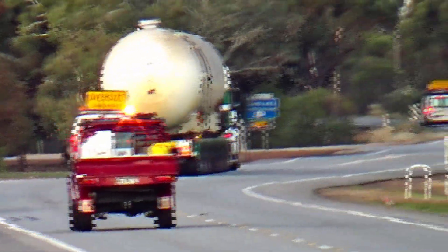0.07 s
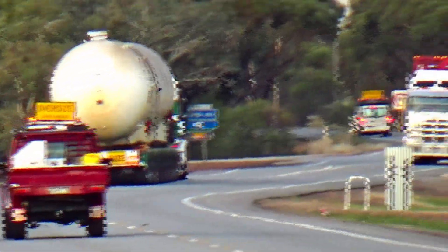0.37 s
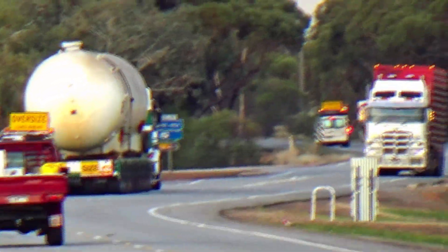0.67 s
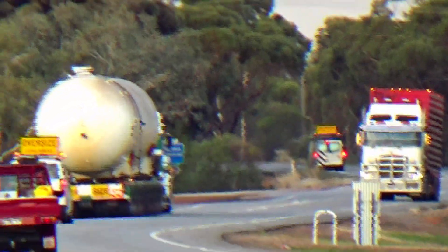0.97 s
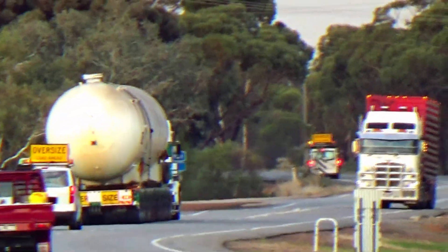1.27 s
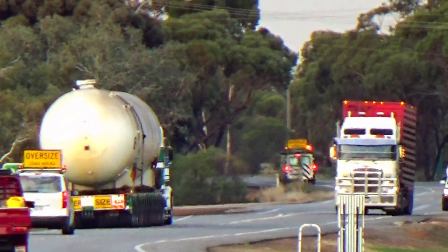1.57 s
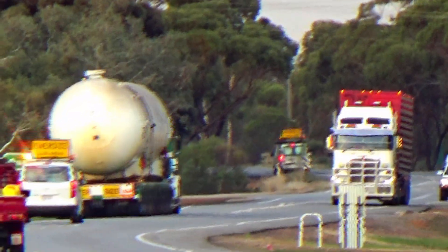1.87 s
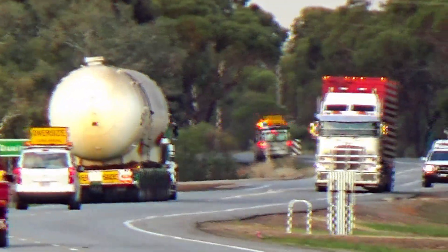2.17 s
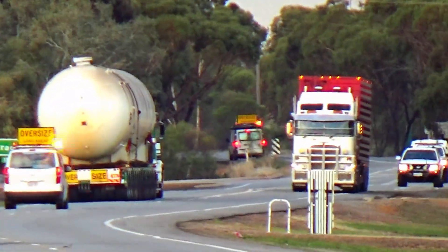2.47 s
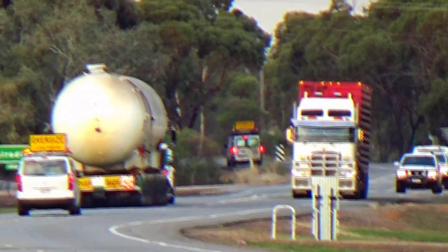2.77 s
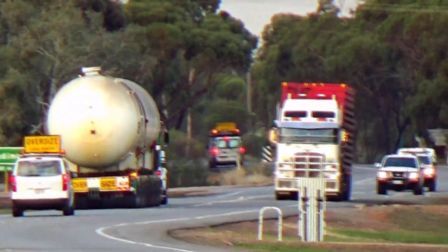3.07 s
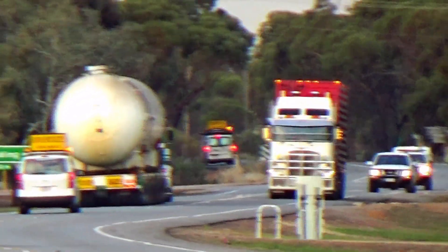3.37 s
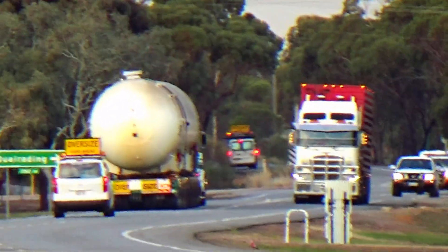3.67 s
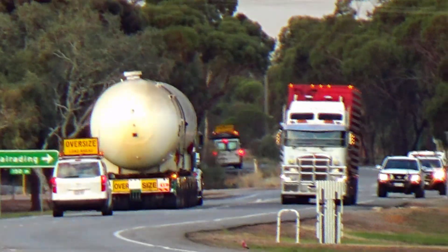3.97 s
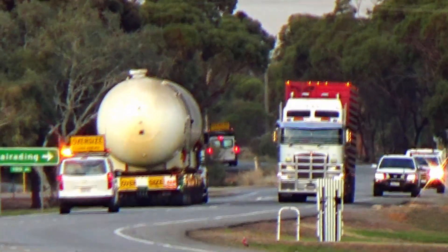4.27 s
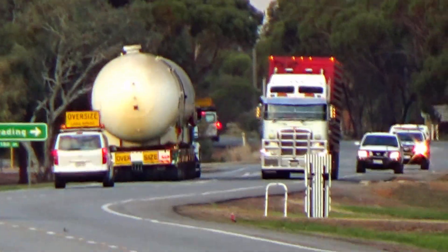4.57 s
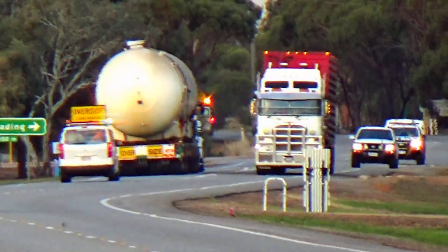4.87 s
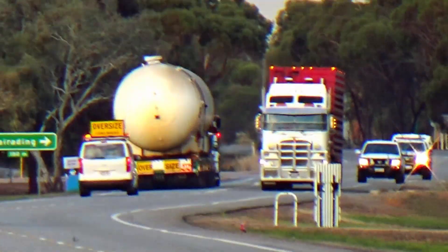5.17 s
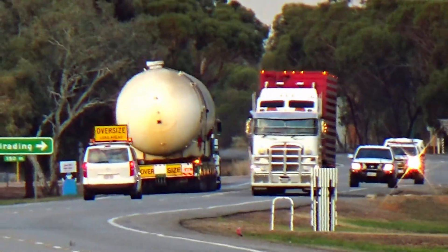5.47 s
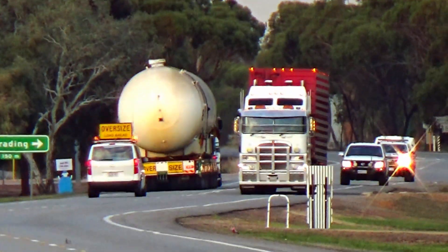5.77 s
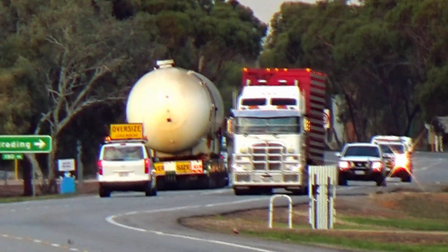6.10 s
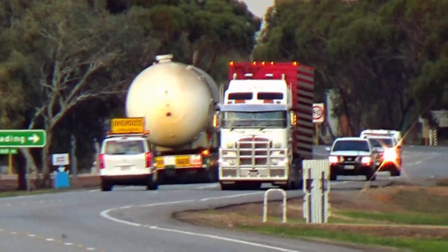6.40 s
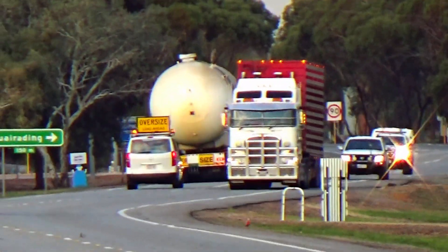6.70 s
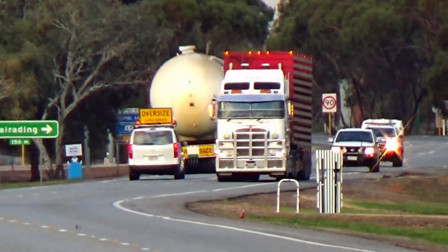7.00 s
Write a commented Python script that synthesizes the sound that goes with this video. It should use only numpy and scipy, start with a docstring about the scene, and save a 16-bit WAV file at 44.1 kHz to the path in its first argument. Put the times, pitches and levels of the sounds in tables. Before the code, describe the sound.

Tyres roar and diesels drone on a highway, growing steadily louder as a big truck nears, with small birds chirping.

```python
"""A big truck nears on a country highway, heard from the verge, as an oversize load and its escorts leave.
Tyres roar on coarse seal, the tread hiss opens up as the truck clears the bend, and diesel exhausts
drone underneath; the departing hauler revs up once. Small birds whistle in the roadside trees and
farther off, and a few dry ticks snap close to the stereo microphone, which adds a soft hiss of its own."""
import sys
import numpy as np
from scipy import signal
from scipy.fft import rfft, irfft
from scipy.io import wavfile

SR = 44100
rng = np.random.default_rng(int(sys.argv[2]) if len(sys.argv) > 2 else 0)


def to_wav(sig):
    """Store sig (one row per channel, or 1-D mono) as 16-bit WAV at the path in sys.argv[1].

    Samples outside -1..1 are clipped; the rate is SR.
    """
    pcm = np.clip(np.atleast_2d(sig), -1, 1) * 32767
    pcm = np.round(pcm).astype(np.int16)
    wavfile.write(sys.argv[1], SR, pcm.T)  # frames by channels


N = 319284
TIME = np.arange(N) / SR
FREQ = np.maximum(np.arange(N // 2 + 1) * SR / N, 1)


# Spectrum of the truck's tyres on coarse seal: freq_hz, level_db
TRUCK_ROAR_SPECTRUM = [(50, -65), (140, -27), (380, -18.5), (490, -11), (590, -3.5), (800, -0.5),
                       (980, -4.5), (1120, -11), (1310, -5.5), (1480, -10), (1650, -15.5), (1900, -15.5),
                       (2300, -19), (2650, -23), (3400, -27), (4500, -34.5), (9000, -50), (15000, -54)]
# Spectrum of the tread hiss: freq_hz, level_db
TREAD_SPECTRUM = [(100, -40), (600, -28), (1500, -20), (2250, -1), (2650, 3.5), (4200, 1.5), (5500, 0.5),
                  (6700, -2.5), (8200, -6), (10000, -17), (15000, -45)]

def truck(near_db, roar_db=-11.5, tread_db=-32.5, far_traffic_db=-57.5, clears_bend_s=5.6):
    """Tyres roar louder and slightly duller as they near; the bend screens their hiss until cleared."""
    tilt = -1.18 - 0.0726 * near_db
    roar = tyres(TRUCK_ROAR_SPECTRUM, roar_db + near_db, tilt, sway_db=-0.14, flutter_db=0.5,
                 scatter_db=-2.5)
    screen_db = -5 * (1 - rise(clears_bend_s, 0.11))
    hiss_db = together(tread_db + near_db + screen_db, far_traffic_db)
    hiss = tyres(TREAD_SPECTRUM, hiss_db, tilt=0.2, sway_db=0, flutter_db=0.5, scatter_db=-1)
    return pan(roar, db=0.5) + pan(hiss, db=-2.1)


# Spectrum of the convoy's tyres down the road: freq_hz, level_db
CONVOY_SPECTRUM = [(60, -52), (150, -7), (330, -8), (450, 1.5), (520, -2.5), (690, -2.5), (860, -1.5),
                   (1020, 1), (1220, -6.5), (1330, -10.5), (1560, -12.5), (2100, -13.5), (3600, -26.5),
                   (5000, -36), (9000, -43), (15000, -66)]

def convoy(start_m=44.4, speed_m_s=14.2, start_db=-30, near_tilt=1.5, far_tilt=-6, trees_m=34):
    """Tyres roll away from the microphone: weaker as 1 / distance, duller as trees come between."""
    gone_m = speed_m_s * TIME
    level_db = start_db - 20 * np.log10(1 + gone_m / start_m)
    tilt = far_tilt + (near_tilt - far_tilt) * np.exp(-gone_m / trees_m)
    return tyres(CONVOY_SPECTRUM, level_db, tilt, sway_db=-0.2, flutter_db=0.36, scatter_db=10.5)


def tyres(colour, level_db, tilt, sway_db, flutter_db, scatter_db):
    """Tyre noise, tilted in dB per octave above 800 Hz; moving air makes each octave sway and flutter."""
    spectrum = rfft(coloured(rng.standard_normal((2, N)), colour))
    octave = np.clip(np.log2(FREQ / 800), -3, 4)
    noise = 0
    for k in range(-3, 5):
        band = irfft(spectrum * np.maximum(1 - abs(octave - k), 0), N)
        band_db = tilt * max(k, 0) + sway_db * walk(0.87) + flutter_db * walk(35)
        noise = noise + band * undb(band_db)
    direct, diffuse = noise * undb(level_db)
    return arrive(direct, diffuse * undb(scatter_db))


# Resonances that grow as the truck nears: pitch_hz, width_hz, nearest_db, share_of_approach
TRUCK_RESONANCES = [(818, 137, -28.5, 0.72), (1285, 190, -34.5, 0.51), (2800, 150, -39.5, 1.1),
                    (3400, 210, -36.5, 1.56)]
# Resonances that come and go as vehicles take the bend: pitch_hz, width_hz, peak_s, half_length_s, level_db
BEND_RESONANCES = [(890, 170, 0.47, .4, -40), (1314, 130, 2.22, 0.62, -40.5),
                   (1360, 170, 4.45, 0.48, -38.5), (2860, 230, 4.3, 0.63, -49), (2270, 310, 6.1, 0.82, -37),
                   (6520, 880, 6.15, .42, -43)]

def resonances(near_db):
    """Tread and rushing air excite narrow resonances that sing over the roar."""
    growing = sum(ring(hz, width) * undb(db + share * near_db)
                  for hz, width, db, share in TRUCK_RESONANCES)
    passing = sum(ring(hz, width) * undb(db) * swell(peak_s, half_s)
                  for hz, width, peak_s, half_s, db in BEND_RESONANCES)
    return arrive(*(growing + passing))


def ring(hz, width_hz, waver_db=2.2):
    """Noise in one narrow resonance, wavering in level: a direct and a diffuse part."""
    peak = np.exp(-2 * ((FREQ - hz) / width_hz) ** 2)
    return unit(shape(rng.standard_normal((2, N)), peak)) * undb(waver_db * walk(20))


# Spectrum of the diesel rumble at the verge: freq_hz, level_db
EXHAUST_SPECTRUM = [(20, -48), (40, -35), (58, -18.5), (78, -13.5), (100, -8), (130, -6.5), (175, 0),
                    (210, -0.5), (260, 3.5), (300, 0), (350, -5), (500, -27), (900, -37), (3000, -70)]

def diesels(near_db, far_db=-43, truck_db=-32.5, firing_hz=86, throb=0.25, hum_hz=39.5, hum_db=-76):
    """Exhaust rumble throbs at the firing rate and grows as the truck nears, over a faint deep hum."""
    level_db = together(far_db, truck_db + 0.72 * near_db)  # the bass swells less than the tyres
    firing_phase = phase_of(firing_hz * (1 + 0.0184 * walk(3.2)))
    puffs = rng.standard_normal((2, N)) * (1 + throb * np.cos(firing_phase))
    rumble = coloured(puffs, EXHAUST_SPECTRUM) * undb(level_db)
    hum = unit(np.sin(2 * np.pi * hum_hz * TIME)) * undb(hum_db)
    return arrive(*rumble) + hum


def hauler(low_hz=120, high_hz=137.4, rev_s=1.55, half_length_s=0.445, cruise_db=-60, pull_db=10.5):
    """The exhaust note climbs and swells as the hauler pulls away, then fades into the rumble."""
    hz = low_hz + (high_hz - low_hz) * rise(rev_s, half_length_s)
    level_db = cruise_db + pull_db * swell(rev_s, half_length_s)
    phase = phase_of(hz * (1 + 0.01 * walk(10)))
    note = unit(np.sin(phase) + 0.14 * np.sin(2 * phase))
    return note * undb(level_db + 2 * walk(12))


# Arched whistles from the near trees: start_s, length_s, pitch_hz, droop_share, fall_share, level_db
BIRD_CHIRPS = [ (.02, 0.1, 4440, .02, 0.074, -51), (.125, 0.036, 4600, 0.033, -0.03, -50),
               (.16, .035, 3850, 0, .03, -43), (.227, 0.054, 3860, 0.012, .03, -47),
               (.3, .36, 3860, 0, -.06, -56), (.64, 0.084, 4780, .03, 0, -59),
               (1.3, .12, 3600, .03, 0.054, -53), (1.915, .04, 3280, .07, .06, -44.5),
               (2.508, 0.019, 3600, 0.0093, -.12, -36), (2.521, 0.029, 4480, .16, 0.22, -39),
               (2.553, 0.017, 4420, .03, .21, -46), (2.71, .05, 3180, 0.0054, .05, -50),
               (2.965, 0.047, 2470, .06, -.08, -43), (3.37, .034, 3320, .05, .1, -46),
               (3.4, .036, 5080, .12, 0, -46.5), (3.676, 0.044, 4380, 0.12, 0, -43),
               (3.73, .018, 4480, .02, .11, -48), (4.247, 0.049, 4660, 0.14, -.19, -36),
               (4.309, 0.033, 3230, 0, .05, -38), (4.34, 0.051, 3560, .04, 0.019, -43),
               (5.625, 0.075, 4980, 0.024, 0.038, -41), (5.684, 0.016, 4500, 0, 0.26, -32),
               (5.879, 0.018, 4150, 0, 0.31, -33.5), (6.638, 0.061, 3300, .1, 0, -32),
               (6.839, 0.053, 3400, .09, 0.096, -28)]
# Almost level piping notes with a strong octave: start_s, length_s, pitch_hz, level_db
BIRD_PIPS = [(5.695, .017, 3860, -35), (5.764, .015, 3990, -30), (5.803, 0.023, 3720, -36),
             (5.85, 0.063, 3940, -36), (6.905, .016, 4080, -32), (6.936, 0.012, 3970, -31),
             (6.958, .015, 4100, -37)]

def near_birds(pip_fall=0.0186, echo_db=-5.5, echo_t60_s=0.59):
    """Birds chirp and pipe to the right of the microphone; the trees send back a soft tail."""
    pips = [(start_s, length_s, hz, 0, pip_fall, db) for start_s, length_s, hz, db in BIRD_PIPS]
    song = whistles(BIRD_CHIRPS) + whistles(pips, octave_db=-5)
    return pan(song, db=-5.5) + undb(echo_db) * scatter(song, echo_t60_s)


def whistles(notes, octave_db=-25, waver=0.01, flicker_db=3.5):
    """Bird notes with their octave: the pitch droops at both ends and glides from start to finish."""
    song = np.zeros(N)
    wobble = 1 + waver * walk(140)
    flicker = undb(flicker_db * walk(120))
    for start_s, length_s, pitch_hz, droop, fall, db in notes:
        span = slice(int(start_s * SR), int((start_s + length_s) * SR))
        u = np.linspace(-1, 1, len(song[span]))  # position within the note
        hz = pitch_hz * (1 - droop * u ** 2 - fall * u * abs(u) / 2)
        phase = phase_of(hz * wobble[span])
        envelope = (1 - u ** 2) ** 0.21 * flicker[span]
        song[span] += undb(db) * envelope * (np.sin(phase) + undb(octave_db) * np.sin(2 * phase))
    return song


# Dry ticks close to the microphone: start_s, peak_db, low_hz, high_hz, decay_s
CLOSE_TICKS = [ (.1922, -26, 2900, 4150, .001), (.4455, -36, 4200, 11000, .001),
               (1.6808, -20, 1550, 4700, 0.00054), (2.5938, -16.5, 3400, 9600, .0015),
               (4.3317, -12.5, 1600, 6150, 0.001), (4.538, -31, 1900, 6000, 0.0011)]

def ticks(rebound_s=0.00132, rebound_db=-6, echo_db=-24, echo_t60_s=0.092):
    """A small hard snap and its rebound, each a burst of a millisecond or so in one broad band."""
    snaps, t = np.zeros(N), TIME[:SR // 20]
    for start_s, peak_db, low_hz, high_hz, decay_s in CLOSE_TICKS:
        rebound = (t > rebound_s) * np.exp(-abs(t - rebound_s) / decay_s)
        envelope = np.exp(-t / decay_s) + undb(rebound_db) * rebound
        band = signal.butter(2, [low_hz, high_hz], "band", fs=SR, output="sos")
        snap = signal.sosfilt(band, rng.choice([-1, 1], len(t)) * envelope)
        start = int(start_s * SR)
        snaps[start:start + len(t)] += undb(peak_db) * snap / abs(snap).max()
    return snaps + undb(echo_db) * scatter(snaps, echo_t60_s)


def far_birds(count=48, length_s=0.06, pitch_hz=3570, droop=0.075, level_db=-54.5, echo_t60_s=0.55):
    """Distant birds twitter at random, heard as much by their echo as directly."""
    notes = []
    for when, stretch, pitch, glide, strength in rng.uniform(-1, 1, (count, 5)):
        start_s = TIME[-1] * (when + 1) / 2
        hz = pitch_hz * 2 ** (0.28 * pitch)
        notes.append((start_s, length_s * 2 ** stretch, hz, droop, droop * glide, level_db + 3 * strength))
    song = whistles(notes)
    return (song + scatter(song, echo_t60_s)) / np.sqrt(2)


def scatter(x, t60_s):
    """A diffuse echo from the roadside, different in each channel."""
    tail = rng.standard_normal((2, SR)) * undb(-60 * TIME[:SR] / t60_s)
    return signal.fftconvolve(x[None], unit(tail) / np.sqrt(SR))[:, :N]


# Phase lead of the microphone's left port on sound from the road: freq_hz, lead_rad
LEFT_LEAD = [(60, 0.15), (200, 0.16), (600, 0.46), (1200, 0.35), (2400, 0.37), (3400, 0.45), (6200, .03),
             (15000, 0)]
# Scatter from the trees, as side level against mid: freq_hz, side_db
TREE_SCATTER = [(60, -24), (300, -50), (700, -39), (1400, -12.5), (2500, -17.5), (5000, -11), (8000, -15),
                (11000, -49)]

def arrive(direct, diffuse):
    """Sound from the road reaches the left port first; scatter from the trees differs between ports."""
    lead = np.exp(0.5j * across(LEFT_LEAD))
    side = shape(diffuse, undb(across(TREE_SCATTER)))
    return np.array([shape(direct, lead) + side, shape(direct, lead.conj()) - side])


def pan(x, db):
    """Make the left channel db louder than the right."""
    return x * undb(np.array([[db], [-db]]) / 2)


def undb(db):
    """Decibels to gain."""
    return 10 ** (np.asarray(db) / 20)


def together(first_db, second_db):
    """Level of two unrelated sounds heard at once."""
    return 20 * np.log10(np.hypot(undb(first_db), undb(second_db)))


def unit(x):
    """Scale to rms 1."""
    return x / np.sqrt(np.mean(x ** 2))


def across(points):
    """Join (freq_hz, value) points on a log-frequency axis."""
    hz, value = np.transpose(points)
    return np.interp(np.log(FREQ), np.log(hz), value)


def shape(x, gain):
    """Filter by a gain for each frequency."""
    return irfft(rfft(x) * gain, N)


def coloured(noise, spectrum):
    """Give noise a (freq_hz, level_db) spectrum, at rms 1."""
    return unit(shape(noise, undb(across(spectrum))))


def phase_of(hz):
    """Running phase of a changing pitch, in radians."""
    return 2 * np.pi * np.cumsum(hz) / SR


def walk(rate_hz):
    """A smooth random drift that changes about rate_hz times a second, at rms 1."""
    return unit(shape(rng.standard_normal(N), np.exp(-(FREQ / rate_hz) ** 2)))


def swell(centre_s, half_length_s):
    """A bell in time, 1 at its centre."""
    return np.exp(-((TIME - centre_s) / half_length_s) ** 2)


def rise(centre_s, half_length_s):
    """A smooth step in time from 0 to 1."""
    return (1 + np.tanh((TIME - centre_s) / half_length_s)) / 2


# The truck's level at the verge, relative to its nearest point: time_s, level_db
TRUCK_APPROACH = [(0, -24.5), (1.9, -22.5), (3.8, -19), (4.6, -13.5), (5.5, -10), (6.05, -5.5), (7.24, -1)]

def scene():
    """Road, birds and ticks from the verge; the truck's approach drives its tyres, resonances and engine."""
    near_db = np.interp(TIME, *np.transpose(TRUCK_APPROACH))
    road = truck(near_db) + convoy() + resonances(near_db) + diesels(near_db) + hauler()
    return road + near_birds() + ticks() + far_birds()


# Spectrum of the microphone's own hiss: freq_hz, level_db
SELF_NOISE_SPECTRUM = [(1000, -5.5), (5000, -7), (9000, 5.5), (15000, 2)]

def record(dry, hiss_db=-57, whine_hz=7790, whine_db=-71, top_hz=15800):
    """The microphone's electronics add a soft hiss and a faint wavering whine, and cut the top."""
    hiss = undb(hiss_db) * coloured(rng.standard_normal(N), SELF_NOISE_SPECTRUM)
    whine_gain = undb(whine_db + 2 * walk(20))
    whine = whine_gain * np.sin(2 * np.pi * whine_hz * TIME + 2 * walk(20))
    top_cut = 1 / np.sqrt(1 + (FREQ / top_hz) ** 600)
    return shape(dry + hiss + whine, top_cut)


dry = scene()
out = record(dry)
to_wav(out)
```